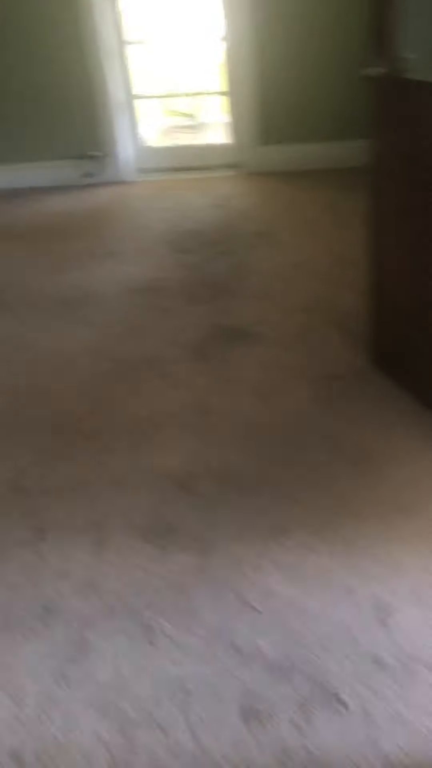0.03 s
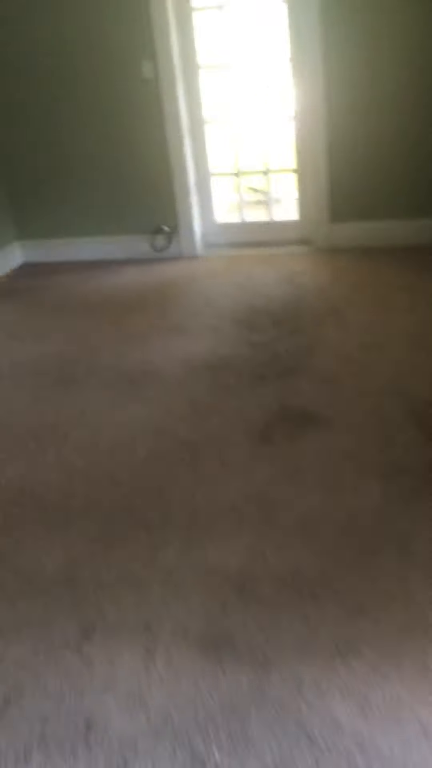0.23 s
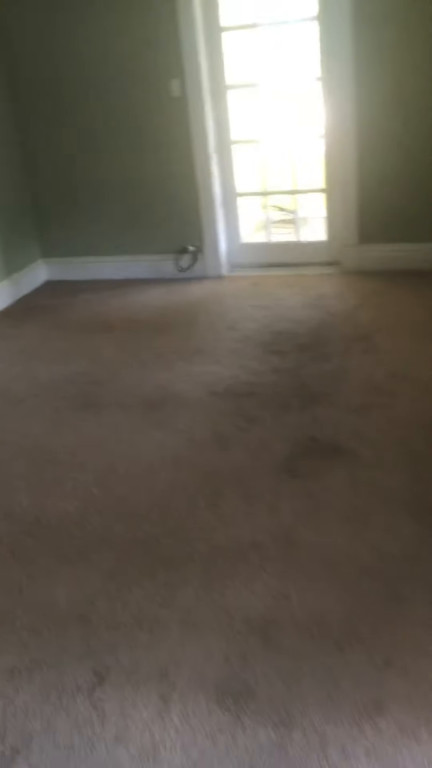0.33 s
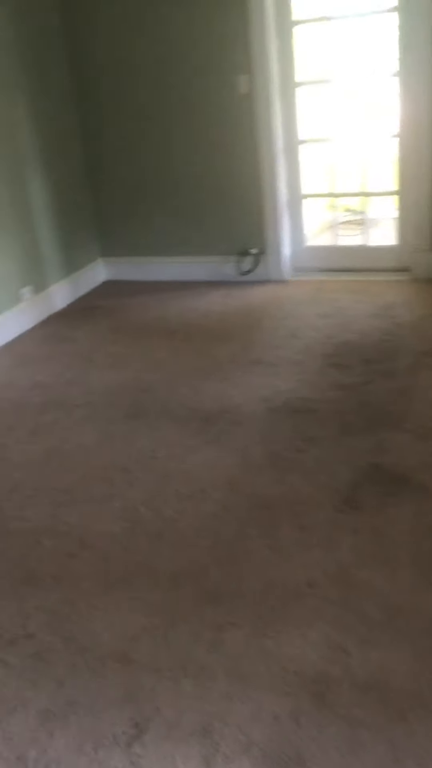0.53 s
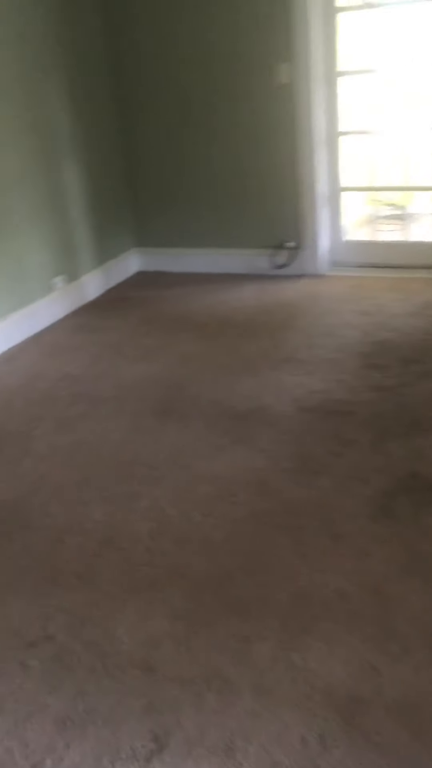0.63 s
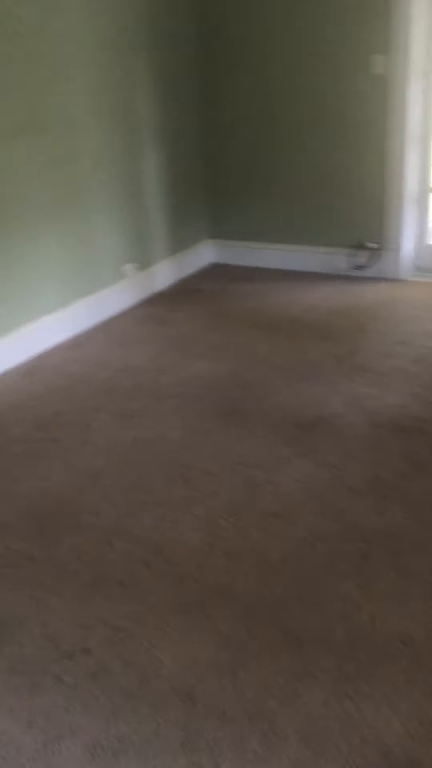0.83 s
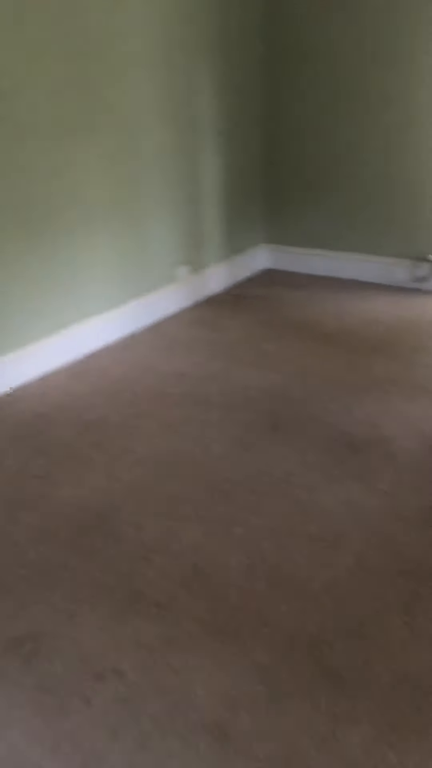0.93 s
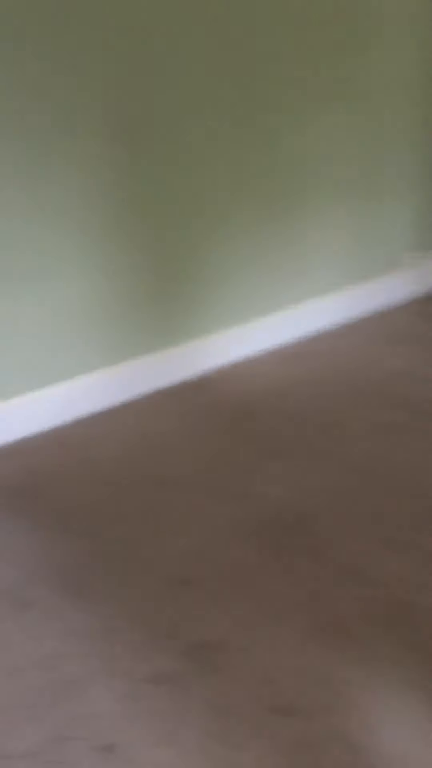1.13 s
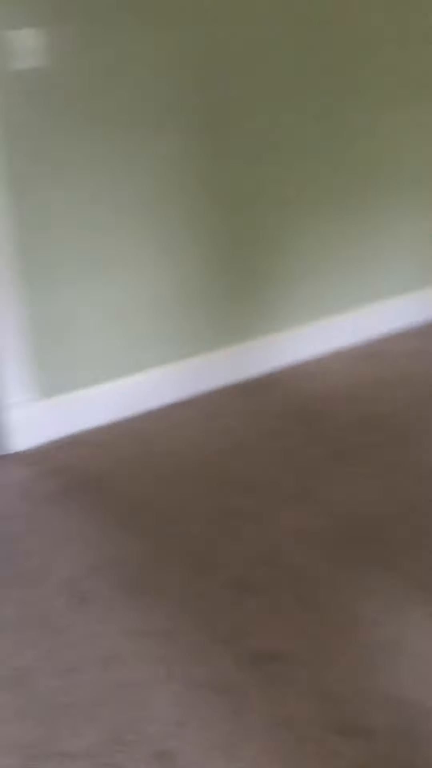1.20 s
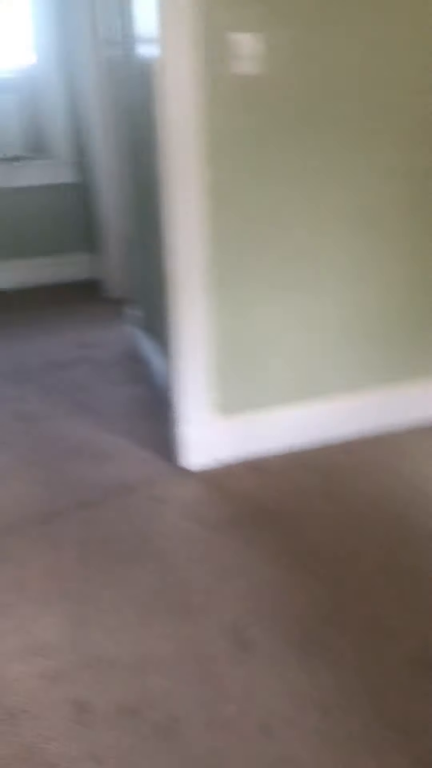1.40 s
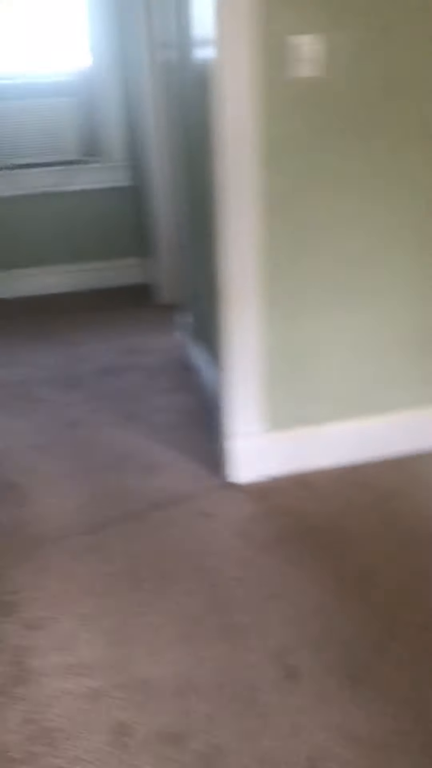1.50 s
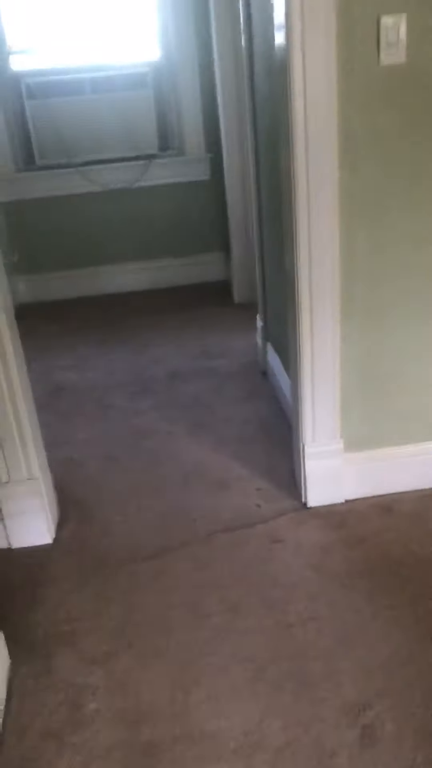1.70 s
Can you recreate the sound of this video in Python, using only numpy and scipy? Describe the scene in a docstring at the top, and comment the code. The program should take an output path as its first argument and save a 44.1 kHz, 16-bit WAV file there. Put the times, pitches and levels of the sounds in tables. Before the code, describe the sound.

A heavy, dull footstep in an empty room, followed by light ticks over quiet rumble.

```python
"""A heavy step in an empty room

A foot lands on a carpeted wooden floor, heel first, then sole. Each impact excites the damped modes
of the boards and the standing waves of the room, and the bare walls return a diffuse echo. An earlier
step's echo fades at the start; ticks, low bumps, rustles and two tiny squeaks lie over a quiet rumble."""
import sys
import numpy as np
from scipy import signal
from scipy.fft import rfft, irfft
from scipy.io import wavfile

SR = 44100
rng = np.random.default_rng(int(sys.argv[2]) if len(sys.argv) > 2 else 0)


def inscribe(sig):
    """Save sig as 16-bit PCM at rate SR to the path in sys.argv[1].

    A 1-D sig is mono; a 2-D sig holds one channel per row.
    Samples are clipped to [-1, 1] before scaling.
    """
    pcm = np.round(np.clip(np.atleast_2d(sig).T, -1, 1) * 32767)
    wavfile.write(sys.argv[1], SR, pcm.astype(np.int16))


N = 77175

# Spectrum of contact noise, in the step and the ticks: frequency_hz, relative_db
CONTACT_SPECTRUM = [(300, -9.5), (1000, 2.5), (2100, 0), (3000, -4), (5500, -11.5), (8000, -25.5),
                    (14000, -50)]


def footstep():
    """Impact excitation: heel and sole each ring the floor and room modes, with an echo and a crack."""
    # Impacts of heel and sole: start_s, level_db, bass_gain_db, crack_db, echo_gain_db
    impacts = [(0.2204, 1.5, -0.5, -44.5, -30.5), (0.2912, -11, -9, -51, -30.5)]
    # Bending modes of the floor: pitch_hz, gain_db, t60_s, build_s
    board_modes = [(120.4, -4.5, 0.071, 0.012), (183.4, -27.5, 0.049, 0.0032), (331, -17.5, 0.031, 0.0021),
                   (451, -37, 0.081, 0.0012), (670.6, -26.5, 0.058, .002), (804, -18.5, 0.03, 0.0019),
                   (862, -21.5, 0.033, 0.002), (926, -32, 0.04, 0.0012), (1200, -36.5, 0.025, 0.00033),
                   (2210, -47.5, 0.019, .001)]
    # Standing waves of the room: pitch_hz, gain_db, t60_s, build_s
    room_modes = [(67.1, -38.5, 0.67, 0.02), (90.7, -48, 0.8, .03), (129.5, -28.5, 0.4, 0.032),
                  (140.2, -13.5, 0.29, 0.11), (252.9, -29.5, 0.45, 0.067), (287.3, -40.5, 0.69, 0.012),
                  (366, -40, 0.5, 0.084), (434, -48, 0.59, .02), (464, -44, 0.29, 0.025),
                  (537, -39.5, 0.35, .02), (684, -36.5, 0.53, 0.027), (725.6, -46, 0.6, 0.026),
                  (983, -52.5, 0.41, .015), (1241, -61, 0.52, 0.018)]
    # Spectrum of an impact's echo: frequency_hz, relative_db
    echo_spectrum = [(28, -29), (45, 2), (75, -2), (130, 5.5), (230, 1.5), (400, -3), (570, -7.5),
                     (740, -5.5), (980, -14), (1150, -21), (1400, -27), (1900, -36.5), (3000, -42.5),
                     (5500, -52), (9000, -71.5), (15000, -64)]
    out = 0
    for start, level_db, bass_gain_db, crack_db, echo_gain_db in impacts:
        t = since(start)
        for hz, gain_db, t60, build in board_modes + room_modes:
            shelf_db = bass_gain_db / (1 + (hz / 400) ** 2)  # acts mainly below 400 Hz
            out += undb(level_db + shelf_db + gain_db) * ring(t, hz, t60, build)
        out += undb(level_db + echo_gain_db) * echo(start, echo_spectrum)
        crack = noise(along(CONTACT_SPECTRUM, bins())) * fade(t, t60_s=0.037, build_s=0.00021)
        out += undb(crack_db) * crack
    return out


def echo(start, spectrum):
    """Diffuse reverberation: dense wall reflections merge into noise, each octave with its decay time."""
    # Reverberation time of the room: frequency_hz, t60_s
    decay_times = [(80, 0.53), (300, 0.48), (900, 0.52), (2500, 1), (8000, 1)]
    t = since(start + 0.0055)  # the first reflection arrives 5.5 ms late
    reflections = rfft(noise(along(spectrum, bins())))
    bin_octave = np.log2(np.clip(bins(), 2 ** 5, 2 ** 14))
    out = 0
    for octave in range(5, 15):
        triangle = np.maximum(1 - abs(bin_octave - octave), 0)
        band = irfft(reflections * triangle, N)
        out += band * fade(t, along(decay_times, 2. ** octave), build_s=0.0027)
    return out


def ticks():
    """Heavily damped vibration: each woody tick is a snap and a short ring that lingers in the room."""
    # Light ticks: start_s, pitch_hz, level_db, t60_s, linger_gain_db, echo_gain_db
    strikes = [(0.0532, 957, -31.5, 0.011, -8, -27.5), (.637, 900, -56, .02, -14, -25),
               (0.9051, 1043, -28.5, 0.0064, -31, -34), (1.193, 1120, -47.5, .012, -41, -33),
               (1.524, 1180, -45.5, 0.0095, -22, -29)]
    # Spectrum of a tick's echo: frequency_hz, relative_db
    echo_spectrum = [(300, -26), (700, -2), (980, 7), (1400, -8.5), (2200, -18), (4000, -33), (9000, -48)]
    build_s, snap_gain_db = 0.0011, -18.5
    out = 0
    for start, hz, level_db, t60, linger_gain_db, echo_gain_db in strikes:
        t = since(start)
        snap = undb(snap_gain_db) * noise(along(CONTACT_SPECTRUM, bins())) * fade(t, t60, build_s)
        reflections = undb(echo_gain_db) * echo(start, echo_spectrum)
        linger = undb(linger_gain_db) * ring(t, hz, t60_s=0.086, build_s=0.034)
        out += undb(level_db) * (ring(t, hz, t60, build_s) + snap + reflections + linger)
    return out


def bumps():
    """Wave packets: a few cycles of a low tone are heard as a soft bump or thud."""
    # Soft, low bumps and thuds: centre_s, level_db, sigma_s, pitch_hz
    thuds = [(0.178, -49, 0.024, 55), (0.422, -42, 0.012, 62), (.512, -45.5, 0.0084, 147),
             (1.122, -55, 0.016, 120), (1.188, -50.5, 0.0073, 69), (1.572, -57, 0.017, 153),
             (1.735, -54, 0.03, 155)]
    return sum(undb(db) * swell(centre, sigma) * np.cos(2 * np.pi * hz * (since(0) - centre))
               for centre, db, sigma, hz in thuds)


def echo_tail_and_rustles():
    """Band-limited noise: an earlier step's room echo dies away at the start, then faint rustles follow."""
    # Echo tail (first row), then rustles: centre_s, sigma_s, centre_hz, half_width_octaves, level_db
    noise_swells = [(-0.01, 0.096, 345, 0.65, -61), (0.216, 0.0038, 750, 0.31, -52),
                    (0.306, 0.0087, 5600, 0.27, -70.5), (0.656, 0.036, 938, 0.2, -67),
                    (0.793, 0.017, 2750, 0.14, -71), (0.796, 0.034, 5500, 0.5, -77.5),
                    (.9, 0.11, 420, 0.64, -67), (1.095, 0.074, 109, 0.59, -64),
                    (1.492, 0.01, 5950, 0.23, -77), (1.518, 0.037, 550, 0.9, -66.5),
                    (1.594, 0.071, 140, 0.56, -61.5), (1.704, 0.081, 450, 0.44, -68.5)]
    return sum(undb(db) * swell(centre, sigma) * noise(hump(hz, octaves))
               for centre, sigma, hz, octaves, db in noise_swells)


def squeaks():
    """Tone bursts: something small squeaks twice, a high sine under a Gaussian envelope."""
    # Tiny squeaks: centre_s, sigma_s, pitch_hz, level_db
    bursts = [(.909, .003, 9720, -70), (.931, .0035, 9700, -73)]
    return sum(undb(db) * swell(centre, sigma) * np.sin(2 * np.pi * hz * since(0))
               for centre, sigma, hz, db in bursts)


def background():
    """Ambient noise: low house rumble and thin hiss, drifting slightly in level."""
    # Spectrum of the room's noise floor: frequency_hz, relative_db
    ambient_spectrum = [(25, -20.5), (37, 5.5), (70, -1), (140, -4.5), (250, -11), (420, -17), (700, -15),
                        (1100, -22), (1700, -28), (3000, -29.5), (5000, -34.5), (8000, -37.5),
                        (10500, -40.5), (15000, -40)]
    level_db, drift_db = -59, 0.6
    knots = rng.standard_normal(12)
    drift = np.interp(np.arange(N), np.linspace(0, N, len(knots)), knots)
    return undb(level_db + drift_db * drift) * noise(along(ambient_spectrum, bins()))


def ring(t, hz, t60_s, build_s):
    """Free vibration of one struck mode: a damped sinusoid."""
    return np.sin(2 * np.pi * hz * t) * fade(t, t60_s, build_s)


def fade(t, t60_s, build_s):
    """Exponential damping: a build-up, then a fall of 60 dB every t60_s."""
    return (1 - np.exp(-t / build_s)) * np.exp(-np.log(1000) * t / t60_s)


def swell(centre_s, sigma_s):
    """Gaussian envelope: a smooth rise and fall."""
    return np.exp(-.5 * ((since(0) - centre_s) / sigma_s) ** 2)


def noise(spectrum_db):
    """Random-phase noise of rms 1 with the given spectral shape."""
    phase = 2 * np.pi * rng.random(N // 2 + 1)
    x = irfft(undb(spectrum_db) * np.exp(1j * phase), N)
    return x / x.std()


def hump(hz, octaves):
    """Resonance curve in dB per bin, 6 dB down at the given octaves either side of hz."""
    return -20 * np.log10(1 + (np.log2((bins() + 1) / hz) / octaves) ** 2)


def along(points, hz):
    """Interpolation of a table on a log-frequency axis."""
    frequencies, values = np.array(points, float).T
    return np.interp(np.log(hz + 1e-9), np.log(frequencies), values)


def bins():
    """Frequencies of the Fourier bins in Hz."""
    return np.arange(N // 2 + 1) * SR / N


def since(start):
    """Seconds since a moment, zero before it."""
    return np.maximum(np.arange(N) / SR - start, 0)


def undb(db):
    """Amplitude ratio from decibels."""
    return 10 ** (np.asarray(db) / 20)


def scene():
    """Superposition: all sources add in one channel."""
    return (footstep() + ticks() + bumps() + echo_tail_and_rustles() + squeaks() + background())[None]


def record(dry):
    """Band limiting: the microphone drops the deepest bass and cuts the top."""
    bottom_hz, top_hz = 30, 15700
    highpass = signal.butter(4, bottom_hz, "high", fs=SR, output="sos")
    lowpass = signal.ellip(10, .1, 70, top_hz, fs=SR, output="sos")
    return signal.sosfilt(lowpass, signal.sosfilt(highpass, dry))


dry = scene()
out = record(dry)
inscribe(out)
```